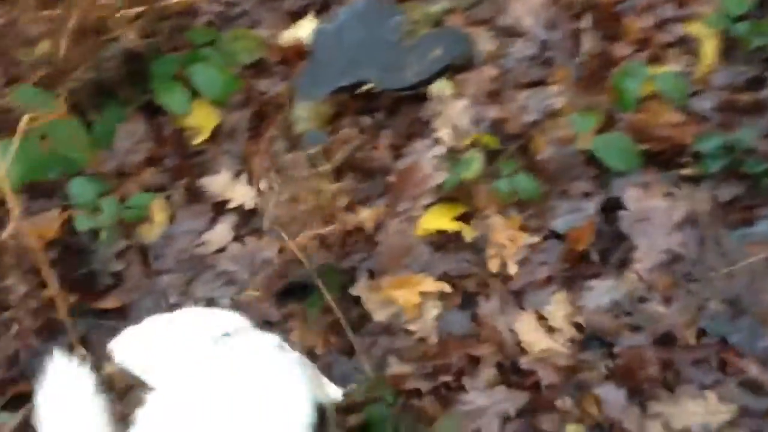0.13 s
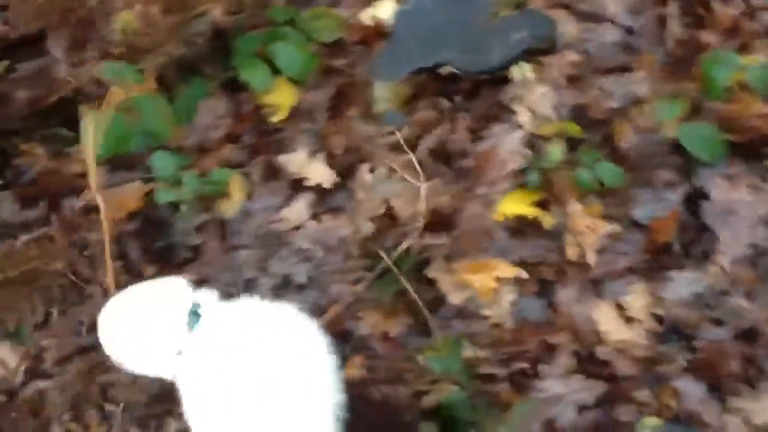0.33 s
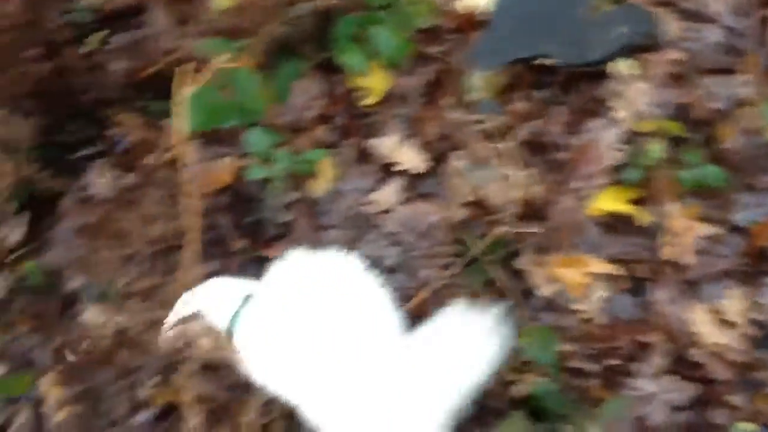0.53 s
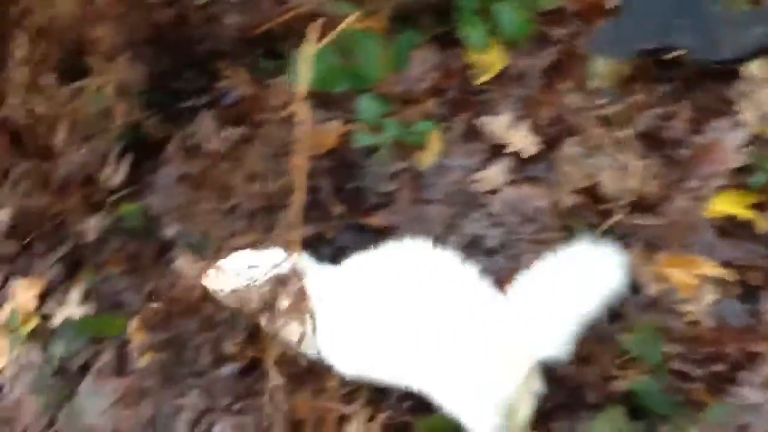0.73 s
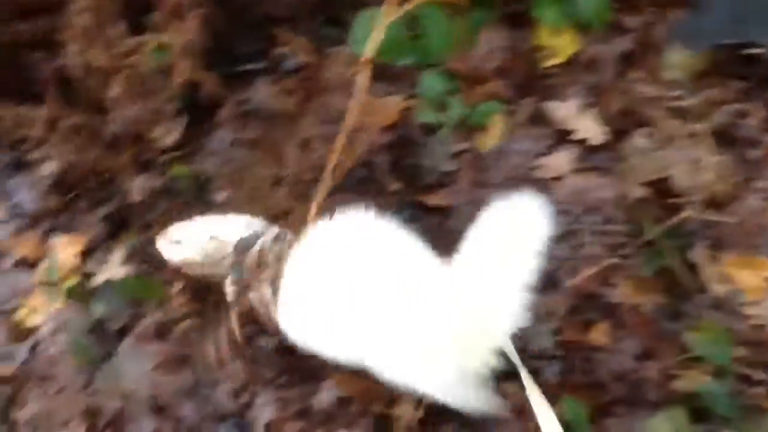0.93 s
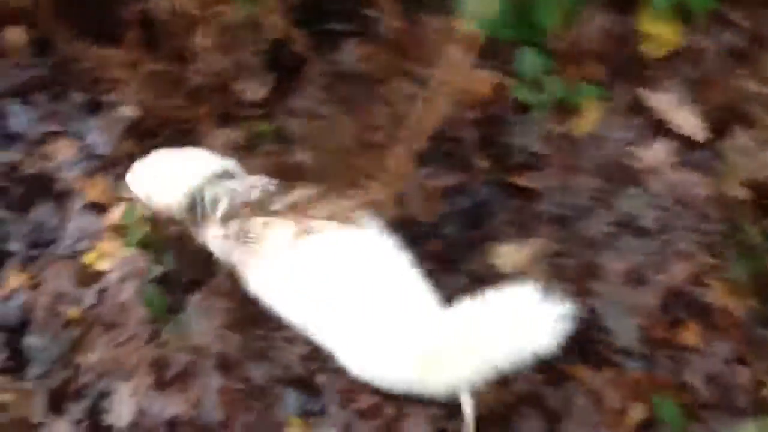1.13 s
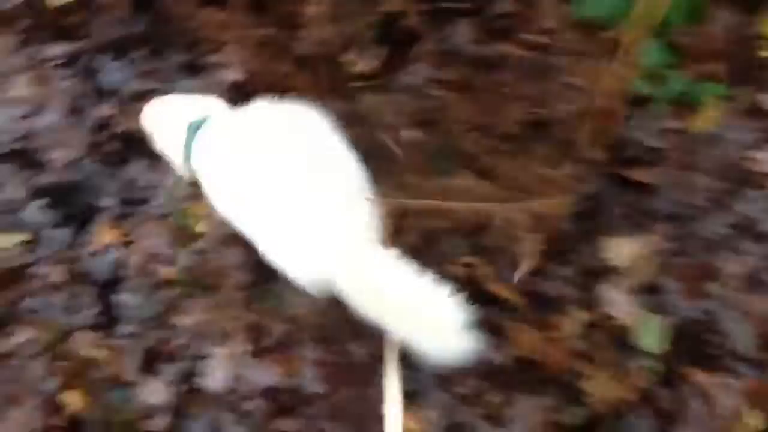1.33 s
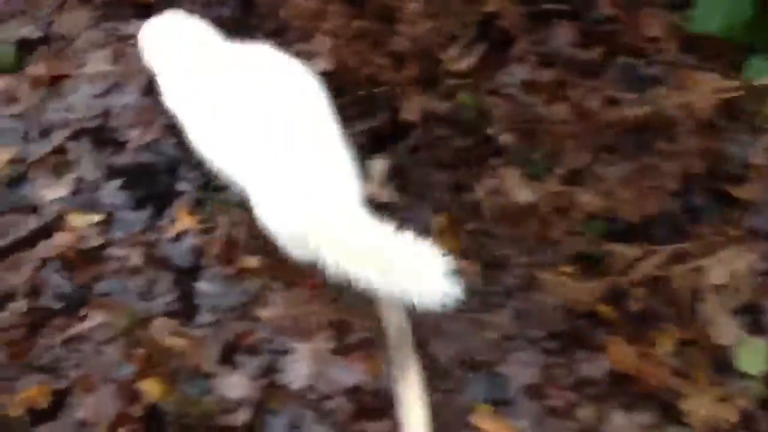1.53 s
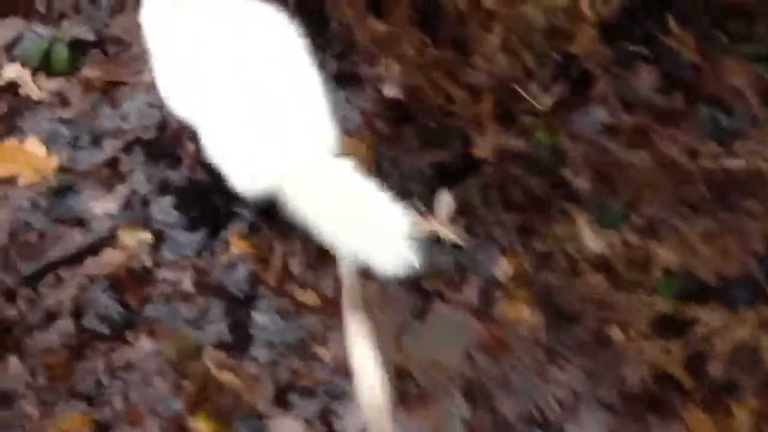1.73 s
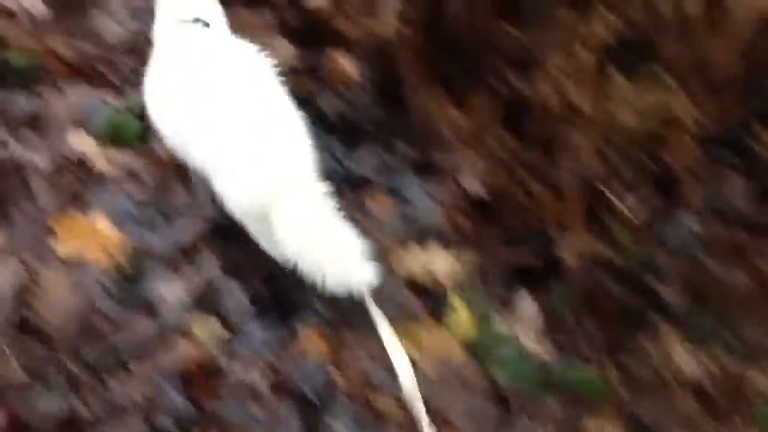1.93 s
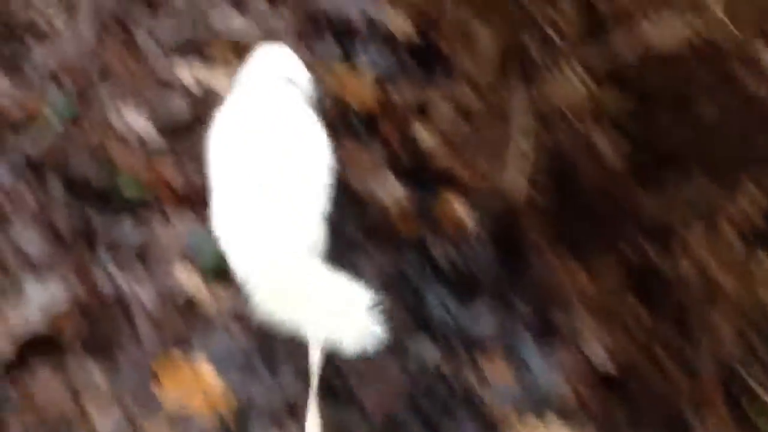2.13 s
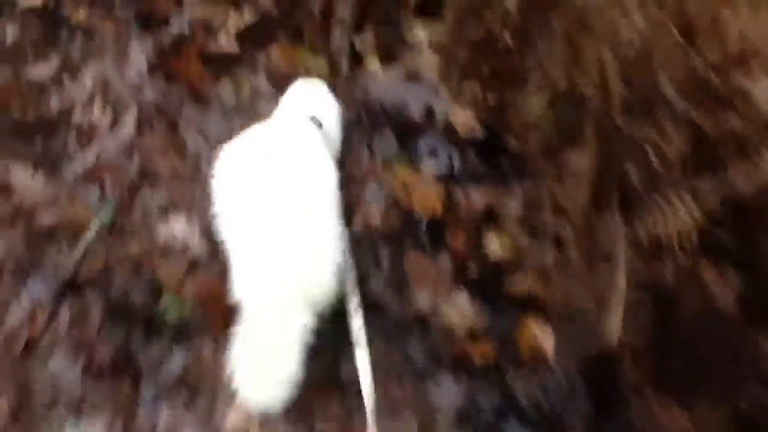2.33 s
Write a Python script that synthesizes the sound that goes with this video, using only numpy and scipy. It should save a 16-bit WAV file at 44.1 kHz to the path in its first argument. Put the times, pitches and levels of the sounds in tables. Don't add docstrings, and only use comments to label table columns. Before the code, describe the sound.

Wind buffeting on a handheld microphone: dense, low fluttering thumps surge at 0-0.3 s and 0.45-0.7 s, then weaken to scattered thuds, one stronger at 1.7 s. Beneath, a small dog's paws faintly rustle and crackle leaf litter in irregular bursts, clearer after 1.8 s. A thin falling bird whistle comes at 0.45 s, a sharp twig crack at 1.86 s, a soft hollow pop at 1.98 s. Faint woodland hiss throughout.

```python
import sys
import numpy as np
from scipy import signal
from scipy.fft import rfft, irfft, next_fast_len
from scipy.io import wavfile
from scipy.ndimage import uniform_filter1d

SR = 44100
rng = np.random.default_rng(int(sys.argv[2]) if len(sys.argv) > 2 else 0)


def dump_mix(stems):
    frames = np.atleast_2d(stems).T
    limited = np.clip(frames, -1, 1)
    pcm = np.round(limited * 32767).astype(np.int16)
    wavfile.write(sys.argv[1], SR, pcm)


def how_loud(loudness_db):
    steps = np.asarray(loudness_db, float) / 20
    return 10 ** steps


N = 104472


def unit(x):
    return x / np.sqrt(np.mean(x ** 2) + 1e-20)


def along(points, hz):
    f, v = np.transpose(points)
    return np.interp(np.log(hz + 1), np.log(f + 1), v)


def filtered(x, response):
    m = next_fast_len(N + 8192)
    return irfft(rfft(x, m) * response(np.fft.rfftfreq(m, 1 / SR)), m)[:N]


def scatter(times, rows, lead=0):
    at = np.round(times * SR).astype(int)[:, None] + np.arange(rows.shape[1]) - lead + SR
    return np.bincount(at.ravel(), rows.ravel(), N + 3 * SR)[SR:SR + N]


def patchy(spectrum, patchy_db):
    z = signal.stft(rng.standard_normal(N + 512), nperseg=256)[2]
    field = uniform_filter1d(uniform_filter1d(rng.standard_normal(z.shape), 8, 0), 8, 1)
    noise = signal.istft(z * how_loud(patchy_db * unit(field)), nperseg=256)[1][:N]
    return unit(filtered(noise, lambda hz: how_loud(along(spectrum, hz))))


def thumps(s, db, hz, flutter_db):
    rise_cycles, release, sag = 0.63, 1.61, 0.14
    turns = hz[:, None] * np.arange(-1024, 1024) / SR
    draw = rng.random((len(s), 3, 1))
    phase = turns - sag * turns ** 2 / 2
    flutter_ratio = 1.8 + 0.9 * draw[:, 1]
    swing = np.cos(2 * np.pi * (phase + draw[:, 0]))
    swing += how_loud(flutter_db) * np.cos(2 * np.pi * (flutter_ratio * phase + draw[:, 2]))
    fade = np.exp(-(turns / (rise_cycles * np.where(turns > 0, release, 1))) ** 2)
    return scatter(s, how_loud(db)[:, None] * swing * fade, lead=1024)


def eddies(s, db, sharp_hz, tilt=0.27, core=2.6):
    # f/Hz, level/dB
    low_cut = [(25, -63.5), (60, -44), (100, -13.5), (175, -5), (300, -3)]
    size, length_cycles, roll_off = 2048, 1, 2.36
    half = size // 2
    f = np.fft.rfftfreq(size, 1 / SR)
    t = (np.arange(size) - half) / SR
    lumps = rng.standard_normal((len(s), size)) * np.exp(-(t * sharp_hz[:, None] / length_cycles) ** 2)
    lumps[:, half] += core * np.sign(lumps[:, half]) * np.linalg.norm(lumps, axis=1) / 2
    shape = how_loud(along(low_cut, f)) * f ** tilt * np.exp(-roll_off * f / sharp_hz[:, None])
    rows = irfft(shape * rfft(lumps), size) * np.hanning(size)
    peak = abs(rows).max(1)
    return scatter(s, rows * (how_loud(db) / peak)[:, None], lead=half)


def wind():
    # t/s, level/dB, sharpness f/Hz
    wind_strength = [(0, -31, 277), (0.061, -19, 400), (0.151, -15.5, 400), (.185, -29, 241),
                     (0.227, -22, 436), (.28, -31.5, 210), (.42, -33, 195), (0.433, -41.5, 200),
                     (0.459, -31, 303), (0.549, -13.5, 352), (.62, -32, 235), (1.12, -30, 218),
                     (1.3, -35.5, 161), (1.7, -34, 169), (1.79, -32.5, 158), (1.95, -43.5, 154),
                     (2.2, -45.5, 145), (2.37, -43.5, 194)]
    # t/s, peak level/dB, pitch f/Hz
    gust_eddies = [(0.013, -21.5, 260), (0.026, -23, 208), (0.036, -18.5, 210), (0.051, -19, 195),
                   (0.064, -14, 212), (0.075, -12.5, 350), (0.091, -14.5, 201), (0.102, -17.5, 244),
                   (0.113, -31, 290), (0.132, -17, 275), (0.142, -21, 291), (0.152, -10, 284),
                   (0.167, -13.5, 241), (0.2, -19.5, 218), (0.208, -14.5, 210), (0.222, -13.5, 294),
                   (0.228, -9, 281), (0.241, -16.5, 171), (0.257, -25, 208), (0.269, -30, 220),
                   (0.302, -24.5, 242), (0.315, -40, 178), (0.331, -27.5, 209), (0.347, -30, 180),
                   (0.36, -32, 160), (0.371, -29, 180), (0.38, -28.5, 212), (0.394, -28.5, 250),
                   (0.451, -24, 214), (0.46, -18.5, 228), (0.469, -17.5, 194), (0.495, -10.5, 224),
                   (0.513, -16.5, 215), (0.521, -16, 270), (0.538, -7.5, 215), (0.551, -11, 314),
                   (0.566, -20, 170), (0.574, -21, 225), (0.587, -20.5, 252), (0.61, -23, 178),
                   (0.621, -17.5, 235), (0.639, -22, 220), (0.654, -14, 209), (0.676, -25.5, 263),
                   (0.685, -22.5, 198), (0.701, -19.5, 180.5)]
    # t/s, peak level/dB, pitch f/Hz
    late_eddies = [(0.746, -19.5, 175), (0.767, -23, 181), (0.802, -27, 218), (0.821, -20, 198),
                   (0.846, -22, 190), (0.856, -18, 233), (0.871, -15, 166), (0.886, -20.5, 238),
                   (0.898, -21, 189), (0.915, -24, 176), (0.944, -22, 207), (0.952, -24, 244),
                   (0.962, -27.5, 270), (0.987, -16.5, 150), (0.998, -29, 227), (1.009, -22.5, 182),
                   (1.017, -23.5, 182), (1.051, -20, 197), (1.076, -18, 170), (1.092, -27, 180),
                   (1.099, -20, 184), (1.106, -31, 212), (1.121, -26, 242), (1.13, -19, 207),
                   (1.139, -18.5, 204), (1.153, -30, 184), (1.175, -27, 203), (1.197, -25.5, 190),
                   (1.245, -30.5, 214), (1.29, -32.5, 155), (1.303, -28, 150), (1.331, -25, 180),
                   (1.372, -33, 179), (1.405, -27, 166), (1.43, -35, 170), (1.459, -43, 168),
                   (1.472, -25.5, 193), (1.481, -22, 186), (1.511, -32.5, 141), (1.519, -31, 212),
                   (1.537, -31.5, 153), (1.55, -27, 196), (1.614, -23.5, 211), (1.667, -21.5, 176),
                   (1.684, -22, 185), (1.696, -12.5, 220), (1.76, -28, 175), (1.772, -21.5, 210),
                   (1.788, -21.5, 191), (1.813, -31.5, 193), (1.891, -32.5, 180), (2.017, -21.5, 243),
                   (2.215, -31, 201), (2.246, -27.5, 156), (2.291, -30.5, 235), (2.326, -32, 188)]
    # t/s, peak level/dB, sharpness f/Hz
    eddy_edges = [(.022, -28.5, 396), (.048, -32, 460), (.0605, -12.5, 480), (.0765, -16, 545),
                  (0.092, -20, 497), (0.1115, -21, 816), (.132, -14, 930), (.140, -16.5, 500),
                  (.150, -13, 520), (.167, -24, 450), (0.2255, -10.5, 860), (0.457, -23, 380),
                  (0.4925, -23, 670), (.519, -18, 750), (.535, -17, 484), (.546, -24, 720),
                  (.5525, -18, 625), (0.5558, -22, 704), (0.647, -18.5, 402), (.822, -25, 302),
                  (.955, -32.5, 317), (1.132, -28, 328), (1.611, -26, 314), (1.695, -21, 312),
                  (2.0165, -16.5, 360), (2.213, -35, 320), ]
    strong = thumps(*np.transpose(gust_eddies), flutter_db=-15)
    strong += thumps(*np.transpose(late_eddies), flutter_db=-25)
    strong += eddies(*np.transpose(eddy_edges), tilt=1, core=7.2)

    eddies_per_s, size_offset_db, size_scatter_db, sharp_octaves = 400, -5, 2, 0.47
    draw = rng.random((int(eddies_per_s * N / SR), 3))
    s = draw[:, 0] * N / SR
    at, strength_db, sharp_hz = np.transpose(wind_strength)
    excess = np.minimum(-np.log(draw[:, 1]), 3)
    size_db = np.interp(s, at, strength_db) + size_offset_db + size_scatter_db * excess
    sharpness = np.interp(s, at, sharp_hz) * 2 ** (sharp_octaves * (draw[:, 2] - .5))
    return strong + eddies(s, size_db, sharpness)


def wood():
    # f/Hz, level/dB
    wood_spectrum = [(290, -10.5), (500, -3), (960, -2), (2600, -15), (7000, -17), (9500, -22),
                     (15200, -22.5)]
    return how_loud(-57) * patchy(wood_spectrum, patchy_db=0.5)


def bird():
    # start t/s, length t/s, from f/Hz, to f/Hz, level/dB
    whistles = [
        (.0, 0.31, 7100, 6670, -77),
        (0.444, 0.069, 6260, 5890, -61.5),
    ]
    t = np.arange(N) / SR
    out = np.zeros(N)
    wander = 3.7 * unit(uniform_filter1d(rng.standard_normal(N), size=200))
    for s, long, from_hz, to_hz, db in whistles:
        u = np.clip((t - s) / long, 0, 1)
        swell = np.sqrt(np.sin(np.pi * u) + 1e-12) * (u < 1)
        phase = 2 * np.pi * np.cumsum(from_hz + (to_hz - from_hz) * u) / SR
        out += how_loud(db) * swell * np.sin(wander + phase)
    return out


def swells(rows):
    t = np.arange(N) / SR
    power = np.zeros(N)
    for s, db, long in rows:
        half_width = long / 2 * np.where(t < s, .6, 1)
        power += how_loud(2 * db) * np.exp(-((t - s) / half_width) ** 2)
    return np.sqrt(power)


def paws():
    # centre t/s, level/dB, length t/s
    paw_steps = [(.13, -58, 0.022), (.28, -64.5, 0.44), (.39, -57.5, 0.095), (.57, -58, 0.051),
                 (.72, -59.5, .06), (.82, -56, 0.034), (.89, -65, 0.091), (.99, -59, 0.065),
                 (1.10, -58.5, 0.095), (1.24, -57.5, 0.033), (1.34, -57, 0.047), (1.42, -58, .07),
                 (1.50, -64, 0.16), (1.60, -61.5, 0.055), (1.68, -58.5, 0.11), (1.80, -59.5, 0.035),
                 (1.85, -51, 0.024), (1.94, -56.5, 0.041), (2.02, -54, 0.11), (2.12, -56.5, 0.16),
                 (2.25, -53, 0.11), (2.32, -54.5, 0.061)]
    # centre t/s, level/dB, length t/s
    deep_presses = [
        (.24, -46.5, 0.024),
        (.39, -65, 0.064),
        (1.11, -62, 0.12),
        (1.95, -57, 0.062),
        (2.01, -48, 0.057),
        (2.07, -54.5, 0.037),
        (2.27, -56.5, 0.087),
    ]
    # f/Hz, level/dB
    litter_spectrum = [(530, -7), (900, -7), (1500, -17), (4700, -7.5), (8500, -3), (10000, -13.5),
                       (15200, -8.5)]
    # f/Hz, level/dB
    deep_spectrum = [(250, -48), (450, -1), (900, -6), (1500, -12.5), (2600, -35), (4000, -49)]
    grains_per_s, grain_hz, grain_octaves, grain_cycles, grain_scatter_db = 3700, 5500, 0.81, 0.39, 3
    count = int(grains_per_s * N / SR)
    hz = np.clip(grain_hz * 2 ** (grain_octaves * rng.standard_normal((count, 1))), 700, 15000)
    turns = hz * np.arange(96) / SR
    size = how_loud(grain_scatter_db * np.minimum(rng.exponential(1, (count, 1)), 3.5))
    grains = np.sin(2 * np.pi * turns) * np.exp(-turns / grain_cycles) * size
    crackle = unit(scatter(rng.random(count) * N / SR, grains))
    swish = how_loud(-3) * patchy(litter_spectrum, patchy_db=2.5)
    return swells(paw_steps) * (crackle + swish) + swells(deep_presses) * patchy(deep_spectrum, patchy_db=-2.5)


def snaps():
    # t/s, peak level/dB, ring f/Hz
    leaf_snaps = [(0.264, -50, 4070), (0.4205, -42, 4600), (0.5344, -41, 7100), (0.572, -52, 7300),
                  (0.6582, -40, 9880), (0.808, -48, 4950), (0.818, -52, 6200), (0.829, -55, 6900),
                  (0.8767, -49, 4770), (1.0005, -51, 3530), (1.1193, -44.5, 3800), (1.2285, -46, 7500),
                  (1.36, -49, 4560), (1.492, -47, 4400), (1.5093, -48, 6500), (1.6026, -49, 7500),
                  (1.6483, -46, 6360), (1.6844, -47.5, 7040), (1.8034, -42.5, 4550), (1.628, -52, 4030),
                  (0.895, -57, 3800), (2.0488, -46, 6000), (1.9395, -44, 4440), (2.0749, -40.5, 9000),
                  (2.1573, -45, 7700), (2.2516, -44.5, 5200), (2.3014, -42.5, 3940), (2.362, -47, 7400)]
    ring_t60, crack_t60, crack_db, snap_db = 0.006, 0.0078, 3.5, 4
    s, db, hz = np.transpose(leaf_snaps)
    t = np.arange(600) / SR
    burst = signal.lfilter([1, -.3], [1], rng.standard_normal((len(s), 600)))
    crack = burst * how_loud(crack_db - 60 * t / crack_t60) / 2
    ring = np.sin(2 * np.pi * hz[:, None] * t) * how_loud(-60 * t / ring_t60)
    attack = 1 - np.exp(-t / 0.000079)
    return scatter(s, (crack + ring) * attack * how_loud(db + snap_db)[:, None])


def twig():
    # t/s, peak level/dB
    twig_cracks = [
        (1.8585, -24),
        (1.8611, -34),
        (1.8651, -43),
    ]
    # f/Hz, level/dB, decay t60/s
    twig_modes = [(4500, -11, 0.011), (8500, 2, 0.0075), (13000, -9, .005), (2300, -13, 0.004),
                  (1300, -14, .005), (6400, -12, .003)]
    t = np.arange(900) / SR
    s, peak_db = np.transpose(twig_cracks)
    ring = sum(how_loud(db - 60 * t / t60) * np.sin(2 * np.pi * hz * t) for hz, db, t60 in twig_modes)
    splinter = how_loud(-10 - 60 * t / .007) * rng.standard_normal((len(s), len(t)))
    attack = 1 - np.exp(-t / .0004)
    return scatter(s, (ring + splinter) * attack * how_loud(peak_db)[:, None])


def pop():
    # t/s, peak level/dB
    stalk_pops = [
        (1.98, -38.5),
    ]
    ring_hz, ring_t60 = 1200, 0.022
    t = np.arange(1200) / SR
    s, db = stalk_pops[0]
    ring = how_loud(db - 60 * t / ring_t60)[None] * np.sin(2 * np.pi * ring_hz * t)
    attack = 1 - np.exp(-t / 0.0008)
    return scatter(np.array([s]), ring * attack)


def scene():
    return (wind() + wood() + bird() + paws() + snaps() + twig() + pop())[None]


def low_pass(x):
    return signal.sosfilt(signal.butter(12, 16540, fs=SR, output="sos"), x)


def record(dry):
    # f/Hz, level/dB
    band_limit = [(15350, 0), (15480, -38), (16540, -42), (16580, -120)]
    ceiling, knee = .5, 4
    limited = dry[0] / (1 + (dry[0] / ceiling) ** knee) ** (1 / knee)
    mix = filtered(limited, lambda hz: how_loud(along(band_limit, hz)))[None]
    return low_pass(mix)


dry = scene()
out = record(dry)
dump_mix(out)
```